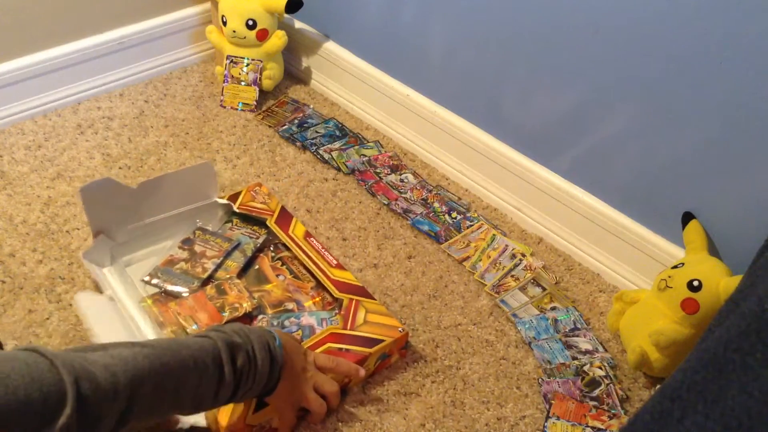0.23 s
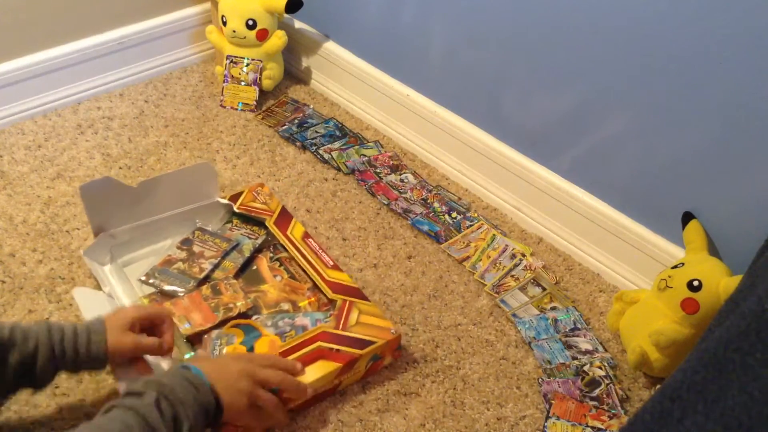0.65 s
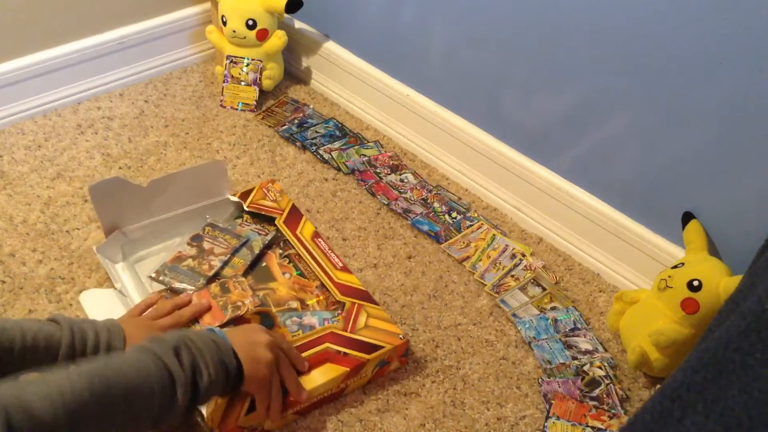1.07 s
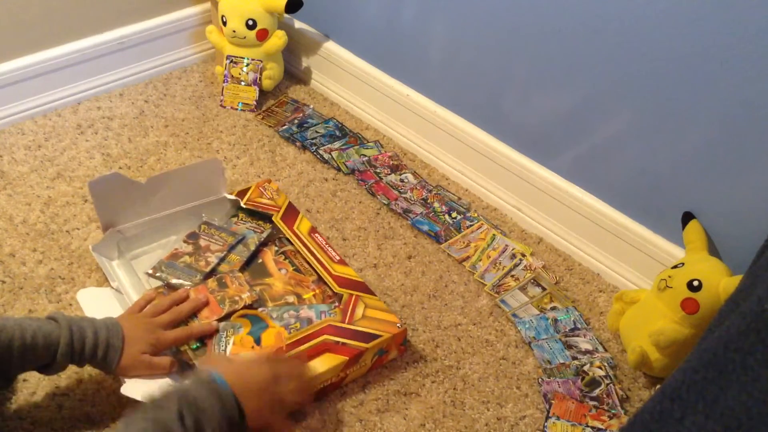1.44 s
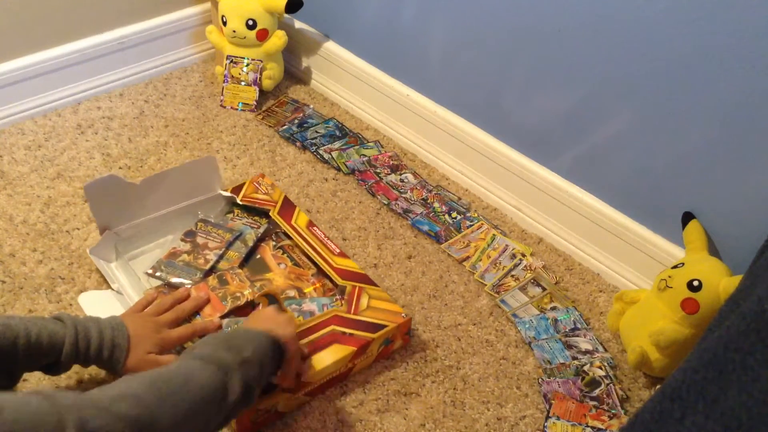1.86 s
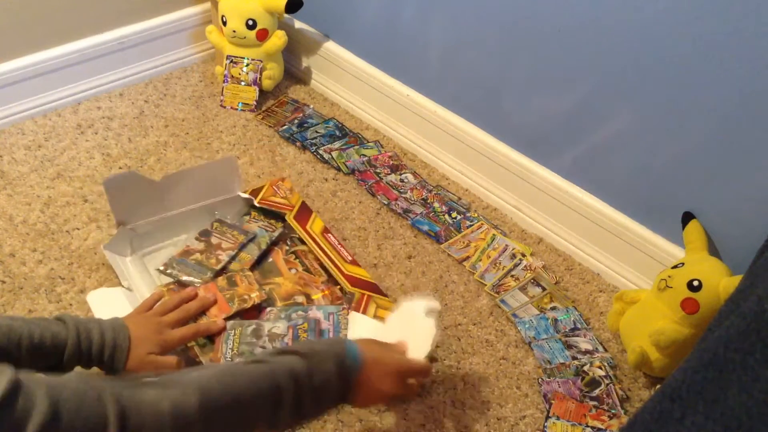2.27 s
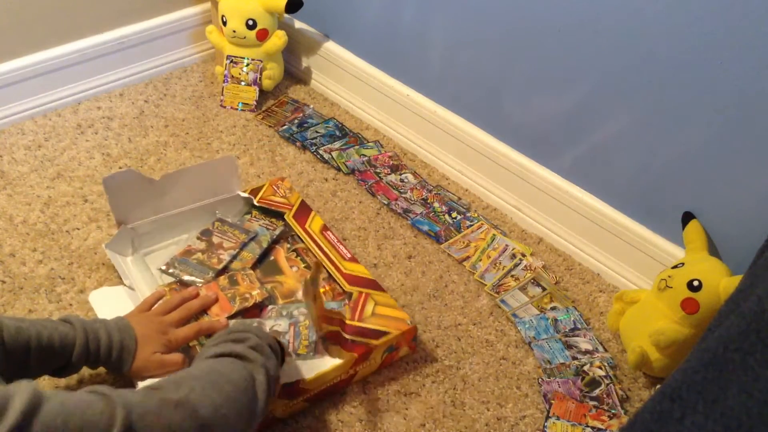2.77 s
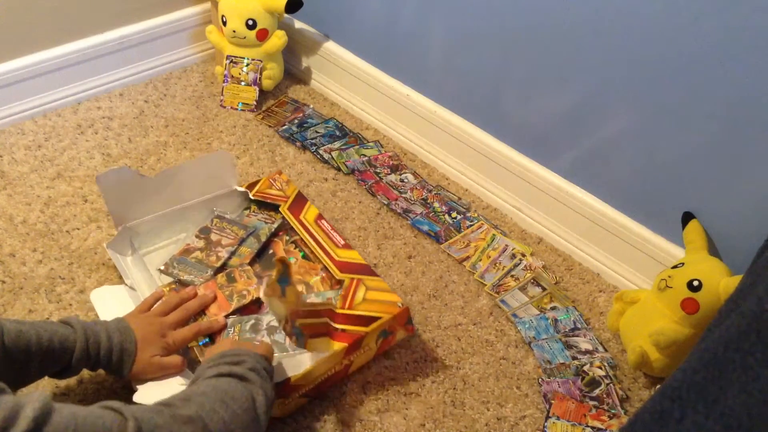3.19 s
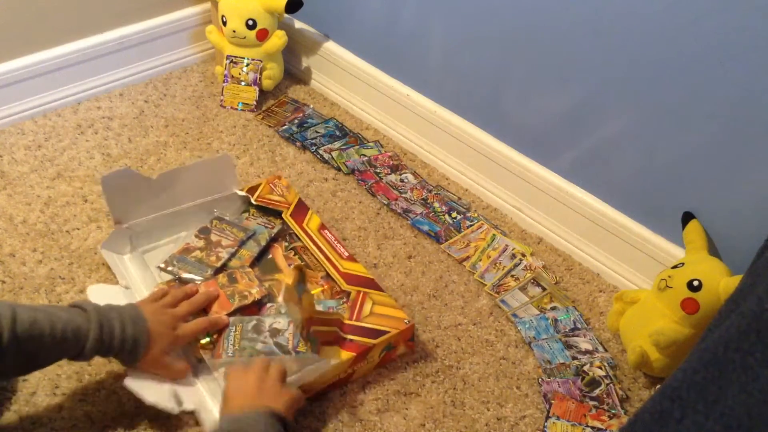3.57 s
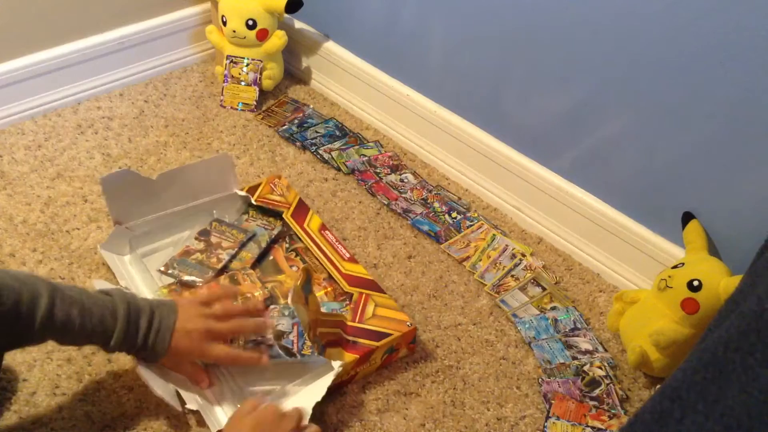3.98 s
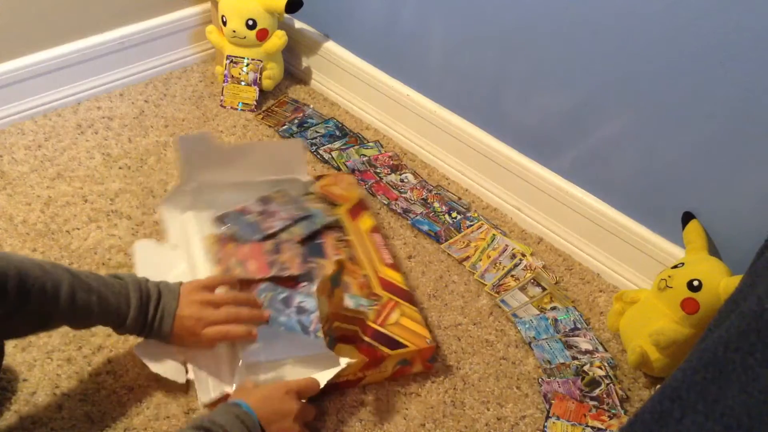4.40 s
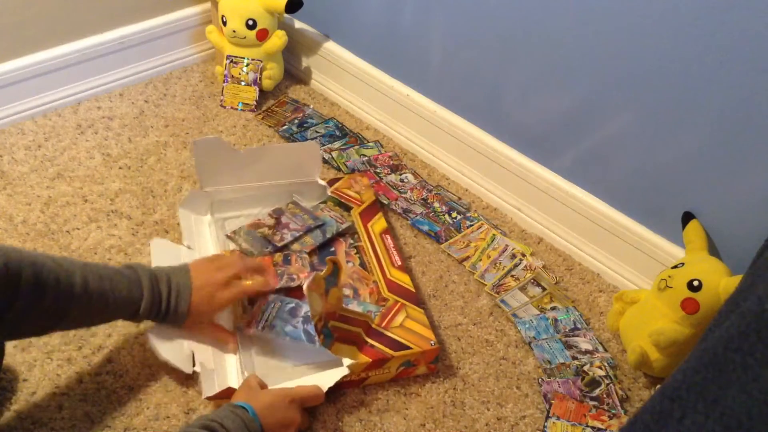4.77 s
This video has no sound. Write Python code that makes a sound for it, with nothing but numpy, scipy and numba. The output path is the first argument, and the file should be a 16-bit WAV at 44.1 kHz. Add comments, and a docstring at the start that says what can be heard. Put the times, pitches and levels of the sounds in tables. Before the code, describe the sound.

Irregular crackly plastic rustles, dry card ticks and small hollow thumps, with a very loud double crack midway, in a quiet carpeted room.

```python
"""Opening a cardboard box on carpet

Hands pry a cardboard box and its thin plastic tray open on a carpet, a metre from a small microphone.
Rubbing and snaps drive resonances of four bodies: the hollow box, its stiff flaps, the tray and its film.
Thumps are short decaying sines; the rubbing and snapping are made of stick-slip clicks.
A small carpeted room answers briefly through eight linked delay lines, over a faint shaped-noise hiss."""
import sys
import numpy as np
from scipy import signal
from scipy.fft import rfft, irfft
from scipy.io import wavfile
from scipy.ndimage import uniform_filter1d
from numba import njit

SR = 44100
rng = np.random.default_rng(int(sys.argv[2]) if len(sys.argv) > 2 else 0)


def to_wav(sig):
    """Store sig (one row per channel, or 1-D mono) as 16-bit WAV at the path in sys.argv[1].

    Samples outside -1..1 are clipped; the rate is SR.
    """
    pcm = np.clip(np.atleast_2d(sig), -1, 1) * 32767
    pcm = np.round(pcm).astype(np.int16)
    wavfile.write(sys.argv[1], SR, pcm.T)  # frames by channels


N = 222264  # samples, about 5 s

# resonances of the hollow box walls: (frequency [Hz], width [Hz], relative level [dB])
BOX_MODES = [(170.4, 47, -5), (248.7, 38, -1), (330.2, 50.3, 2.5), (460, 63, -2), (570, 117, -2.5),
             (721, 143, -3), (914, 142, -5.5)]
# resonances of the stiff flaps: (frequency [Hz], width [Hz], relative level [dB])
FLAP_MODES = [(1046, 356, -4.5), (1220, 480, 1), (1629, 242, 2.5), (1832, 140, 1), (2060, 385, -2.5),
              (2413, 330, -0.5), (3220, 920, -8.5)]
# resonances of the plastic tray: (frequency [Hz], width [Hz], relative level [dB])
TRAY_MODES = [(3660, 1300, -1), (4783, 483, 9), (4810, 930, 7), (6682, 294, -1.5), (6752, 87, 8),
              (8350, 2660, -4)]
# resonances of the crinkly film: (frequency [Hz], width [Hz], relative level [dB])
FILM_MODES = [(8930, 400, 1.5), (8700, 520, 9.5), (9670, 6400, 5.5), (13420, 2440, 7.5), (16800, 1650, 5.5)]
# spectrum of room tone and microphone noise: (frequency [Hz], relative level per Hz [dB])
HISS_SPECTRUM = [(64, 5), (157, 1.5), (336, -3), (616, -25), (988, -27), (1630, -27), (2120, -15.5),
                 (13700, -20), (16000, -40)]
# snaps of tray and card: (time [s], tray level [dB], film level [dB], card level [dB],
# burst t60 [s], first tick over the burst [dB])
SNAP_EVENTS = [(0.0707, -31, -38, -28.5, 0.049, 19), (.1144, -50, -36, -70, 0.074, 12),
               (0.153, -43, -53, -40, 0.065, 5), (0.2677, -47, -24, -39, 0.02, 12.5),
               (0.2942, -61, -39, -27, 0.079, 22), (0.33, -51, -33.5, -42, 0.16, 0),
               (0.4796, -53.5, -47, -54, 0.043, 8), (.6268, -45, -46, -45.5, 0.038, 10),
               (0.6995, -40, -38, -41, 0.052, 16.5), (0.7116, -35, -53, -46, 0.029, 16),
               (0.8, -53.5, -62, -55, 0.15, 5), (0.824, -47, -49, -45, 0.035, 4),
               (0.896, -50.5, -62, -47, 0.055, 12), (1.059, -51, -68, -59, 0.036, 5),
               (1.1325, -34, -44, -34.5, 0.072, 0), (1.1367, -20.5, -12, -26, 0.058, -9),
               (1.181, -63, -48, -33, 0.085, 0), (1.3495, -51, -43, -44.5, 0.026, 6),
               (1.552, -58, -64, -48, 0.035, 2), (1.562, -50.5, -52, -47, 0.19, 3),
               (1.7246, -54, -43.5, -38.5, 0.055, 8), (1.815, -61, -56, -74, .067, 3),
               (1.8526, -37.5, -47, -40.5, 0.036, 12), (1.8775, -36, -46, -47, 0.096, -5),
               (1.897, -39, -33, -41, 0.062, 15), (2.032, -56, -44, -29.5, 0.036, 17),
               (2.1121, -32, -39, -37, 0.067, 19.5), (2.125, -49, -51, -32.5, 0.038, 11),
               (2.164, -35.5, -49, -32.5, 0.036, 21), (2.2207, -44, -33, -41, 0.047, 10),
               (2.288, -39, -40.5, -42.5, 0.06, 10.5), (2.3147, -49, -40.5, -43.5, 0.076, 15),
               (2.394, -72, -67, -55, 0.07, 0), (2.467, -75, -75, -45.5, 0.023, 11),
               (2.5304, -40.5, -39, -35.5, 0.097, 20), (2.5588, -57, -66, -54, 0.12, 8),
               (2.6, -68, -52, -49, 0.031, 7), (2.658, -73, -73, -48, 0.037, 1),
               (2.7077, -59, -51, -42, 0.075, 0), (2.7236, -42, -46, -42, 0.05, 1),
               (2.8219, -47.5, -51, -46, .047, 14.5), (2.843, -72, -70, -40, 0.011, -3),
               (2.897, -45.5, -51, -41.5, 0.065, 2), (3.003, -52.5, -58, -54, 0.08, 9),
               (3.2897, -76, -75, -49, .03, 10), (3.343, -21, -23, -18.5, 0.074, 12),
               (3.3732, -17, -14, -17, 0.056, 19.5), (3.478, -44, -37, -37, 0.11, 8),
               (3.677, -49, -66, -48.5, 0.067, 0), (3.705, -65, -69, -49, 0.12, 11),
               (3.822, -61.5, -64, -60, 0.11, 26), (3.864, -39.5, -47, -34.5, 0.037, 13.5),
               (3.94, -58, -44, -51, 0.097, 13), (4.0584, -58, -60, -52.5, 0.18, 0),
               (4.187, -47, -47, -58, 0.1, 0), (4.234, -49, -60, -40.5, 0.031, 17),
               (4.2693, -53, -59, -49, 0.086, 25), (4.295, -52, -37.5, -48, 0.045, 11),
               (4.3755, -60, -58, -47, 0.074, 15), (4.4035, -53, -47, -57, .056, 20),
               (4.4435, -56, -45, -66, 0.03, 23.5), (4.4618, -67, -56, -74, 0.035, 22),
               (4.483, -36.5, -55, -55, 0.064, 4), (4.52, -45, -41, -54, 0.038, 21),
               (4.545, -58, -51, -53, 0.024, 3), (4.704, -42, -46, -52.5, 0.075, 3),
               (4.79, -48, -46.5, -64, 0.11, 8), (4.8133, -66, -48, -67, .03, 19),
               (4.8565, -62, -47, -41, 0.063, 5), (4.8864, -45.5, -47, -41, 0.063, 14),
               (4.905, -52, -48, -49, 0.056, 12), (4.958, -62, -64, -49, 0.047, 10),
               (4.971, -43, -53, -55, 0.099, 5)]
# knocks on walls (low) and flap edges (high): (time [s], level [dB], pitch [Hz], t60 [s])
KNOCK_EVENTS = [(.0705, -25.5, 2790, 0.047), (.072, -27.5, 1633, 0.042), (.153, -34, 622, .05),
                (0.2959, -12.5, 1377, 0.013), (.299, -27, 315, 0.089), (.709, -35, 655, 0.042),
                (0.768, -44, 1630, .04), (.822, -43, 335, .05), (.897, -38.5, 337, 0.068),
                (0.975, -42, 334, 0.048), (1.138, -27.5, 387, 0.024), (1.146, -23, 440, 0.042),
                (1.182, -32, 330, .04), (1.189, -12, 333, .035), (1.45, -47, 617, 0.041),
                (1.9675, -26, 1740, 0.084), (2.036, -25, 707, .075), (2.113, -32, 796, .04),
                (2.1248, -35, 3110, 0.035), (2.1655, -32.5, 3200, 0.04), (2.167, -34, 780, .04),
                (2.228, -33, 276, 0.074), (2.318, -36.5, 290, 0.052), (2.4682, -46, 1690, 0.031),
                (2.528, -31.5, 1570, 0.056), (2.53, -37, 706, .05), (2.535, -32.5, 354, 0.074),
                (2.602, -42, 1610, .04), (2.6585, -47, 1610, .04), (2.712, -30, 298, 0.037),
                (2.8424, -46, 1580, .04), (2.901, -31, 336, .064), (3.2914, -45, 1440, .028),
                (3.343, -14.5, 1645, 0.047), (3.344, -15.5, 940, 0.038), (3.346, -16.5, 396, 0.056),
                (3.376, -7, 1580, 0.019), (3.375, -16, 336, 0.045), (3.377, -22, 916, 0.044),
                (3.379, -15.5, 654, .05), (3.482, -31.5, 434, 0.082), (3.4844, -37.5, 2150, 0.089),
                (3.866, -34.5, 3230, 0.04), (3.866, -37, 5270, 0.033), (4.05, -45.5, 545, 0.044),
                (4.1, -40.5, 339, 0.21), (4.123, -36.5, 1614, .036), (4.192, -36.5, 800, 0.046),
                (4.2169, -38, 1665, .05), (4.234, -34, 329, .055), (4.2702, -40, 1694, .034),
                (4.379, -32, 330, .047), (4.518, -29.5, 1670, 0.032), (4.542, -28.5, 338, 0.057),
                (4.708, -44.5, 334, 0.18), (4.8574, -50, 2420, .022), (4.858, -41, 383, .05),
                (4.862, -33, 900, 0.029), (4.887, -25.5, 502, 0.018)]
# sliding and tearing: (time at full strength [s], hold [s], tray level [dB], film level [dB], card level [dB])
STROKE_EVENTS = [(0, 0.062, -52, -42.5, -48), (0.083, 0.065, -48.5, -44, -49),
                 (.21, 0.057, -44.5, -35.5, -46.5), (0.302, 0.033, -68, -44.5, -49),
                 (0.607, 0.01, -56, -59, -52), (1.106, 0.096, -61, -56, -65), (1.17, 0.019, -46, -45, -45),
                 (1.59, 0.16, -66.5, -62.5, -57.5), (1.884, 0.018, -41.5, -36, -50.5),
                 (1.927, 0.027, -41, -34.5, -39), (1.977, 0.043, -39.5, -30, -36.5),
                 (2.05, 0.038, -47, -40, -45.5), (2.19, .02, -57, -65, -57), (2.404, 0.024, -68, -64, -71),
                 (2.689, 0.014, -73, -63, -59), (3.07, 0.15, -72, -69, -67.5),
                 (3.396, 0.032, -39.5, -41, -42), (3.641, .12, -71, -57, -91),
                 (3.887, 0.06, -65.5, -77, -62), (4.119, 0.017, -52, -51, -50.5),
                 (4.22, 0.01, -54.5, -52, -47), (4.281, 0.012, -60, -52, -78), (4.39, 0.027, -71, -58, -77),
                 (4.508, 0.017, -42.5, -43, -46), (4.563, 0.025, -61, -67, -58),
                 (4.975, 0.072, -52, -49.5, -52.5)]
# hands resting and shifting on the card, before the shares below: (time [s], level [dB])
TOUCH_LEVEL = [(0, -94), (.45, -58), (.6, -58), (.9, -59.5), (1.1, -61.5), (1.3, -65.5), (1.5, -65),
               (1.7, -66.5), (2.2, -56), (2.4, -61.5), (2.55, -71.5), (2.75, -59.5), (3.0, -63.5),
               (3.3, -64.5), (3.55, -56.5), (3.9, -62), (4.35, -62.5), (4.6, -61), (4.68, -65), (4.9, -59),
               (5.04, -71)]
# how the touch divides: one level [dB] each for tray, film, flap, box
TOUCH_SHARES_DB = [-6.5, -3.5, -4, 0.5]

HISS_DB = -61  # rms, ahead of the microphone's bass cut
RUMBLE_DB = -92  # rms
# decay of the echo before damping; damping runs from 0 (bright) to 1
ROOM_T60_S, ROOM_DAMP, ROOM_DB = 0.13, 0.46, -18.5
TOP_HZ, BASS_CUT_HZ = 15400, 150
CLIP = .78  # full scale is 1
SOFT_RISE_S, HARD_RISE_S, SOFT_DB, HARD_DB = 0.003, 0.00095, -51, -14  # harder snaps rise faster
BOX_SNAP_DB, BOX_RUB_DB = 2.5, -3.9  # walls against flaps
BOX_EXTRA_RISE_S = 0.00052
ATTACK_DB_PER_S, RELEASE_DB_PER_S = 435, 400  # strokes
WALL_HZ, EDGE_HZ, WALL_RISE_S, EDGE_RISE_S = 500, 1300, 0.0014, .0004  # knocks
CRACK_UNDER_TICK_DB, CRACK_T60_S, TICK_DELAY_S = 11, .0022, .0008


def undb(db):
    """Gain of a level in dB."""
    return 10 ** (np.asarray(db) / 20)


def unit(x):
    """Scaled to rms 1."""
    return x / np.sqrt(np.mean(x ** 2))


def add(track, s, x):
    """Mixes x into the track from time s."""
    i = int(s * SR)
    track[i:i + len(x)] += x[:N - i]


def walk(rate):
    """Random levels, rate per second, joined by straight slopes; spread a little under 1."""
    k = int(SR / rate)
    held = np.repeat(rng.standard_normal(N // k + 1), k)
    return uniform_filter1d(held, k)[:N]


def ring(x, modes, patchy_db, rate):
    """A body as a sum of resonances; the touched spot wanders, so each is struck unevenly."""
    tick = np.zeros(8192)
    tick[0] = 1
    out, response = 0, 0
    for k, (hz, width, db) in enumerate(modes):
        b, a = signal.iirpeak(hz, hz / width, SR)
        gain = (-1) ** k * undb(db)  # neighbours alternate in sign
        uneven = x * undb(patchy_db * walk(rate))
        out = out + gain * signal.lfilter(b, a, uneven)
        response = response + gain * signal.lfilter(b, a, tick)
    return out / np.sqrt(np.sum(response ** 2))  # a single tick rings with unit energy


def crackle(rate, spread_db, cap_db=12):
    """Stick-slip clicks at random moments, rate per second, some bigger than the rest."""
    moment, side, size = rng.random((3, N))
    size_db = np.minimum(-spread_db * np.log(1 - size), cap_db)
    return unit((moment < rate / SR) * np.sign(side - .5) * undb(size_db))


def burst(db, t60, rise_s, tail_db, tail_t60):
    """Envelope of one release: a rise, a fast fall, then a weaker after-rattle."""
    t = np.arange(SR // 2) / SR
    fall = undb(-60 * t / t60)
    rattle = undb(tail_db - 60 * t / tail_t60)
    return undb(db) * (1 - np.exp(-t / rise_s)) * (fall + rattle)


def rubbing():
    """Drive of the four bodies as fingers and card slide and tear; the pressure never holds still."""
    t = np.arange(N) / SR
    touch_db = np.interp(t, *np.transpose(TOUCH_LEVEL))
    drive = undb(touch_db) * undb(TOUCH_SHARES_DB)[:, None]
    for s, hold_s, tray_db, film_db, card_db in STROKE_EVENTS:
        before = np.maximum(s - t, 0)
        after = np.maximum(t - s - hold_s, 0)
        stroke = undb(-ATTACK_DB_PER_S * before - RELEASE_DB_PER_S * after)
        body_gains = undb([tray_db, film_db, card_db, card_db + BOX_RUB_DB])
        drive = drive + body_gains[:, None] * stroke
    grip_db = 2.2 * walk(45)  # shared by all four
    own_db = [1.5 * walk(90), 1.6 * walk(80), 1.8 * walk(90), 2.2 * walk(60)]
    return drive * undb(grip_db + own_db)


def bodies(drive, blows):
    """Slips as strong as the drive, and single blows, ring tray, film, flaps and box."""
    slips = [crackle(6000, spread_db=5.5), crackle(9000, spread_db=4.5),
             crackle(3000, spread_db=6.0), crackle(4000, spread_db=3.23)]
    tray, film, flap, box = drive * slips + blows
    return (ring(tray, TRAY_MODES, patchy_db=2.0, rate=70)
            + ring(film, FILM_MODES, patchy_db=2.0, rate=40)
            + ring(flap, FLAP_MODES, patchy_db=1.12, rate=50)
            + ring(box, BOX_MODES, patchy_db=2.0, rate=25))


def hiss():
    """Steady room tone and microphone noise: white noise shaped across frequency."""
    hz, db = np.transpose(HISS_SPECTRUM)
    bins_hz = np.fft.rfftfreq(N, 1 / SR)
    colour = undb(np.interp(np.log(bins_hz + 1), np.log(hz), db))
    noise = irfft(rfft(rng.standard_normal(N)) * colour, N)
    return undb(HISS_DB) * unit(noise)


@njit
def walls(x, lags, gain, damp):
    """Room echo: eight delay lines that feed each other, duller on every round."""
    line, soft, out = np.zeros((8, 4096)), np.zeros(8), np.zeros(len(x))
    for i in range(len(x)):
        total = 0.
        for k in range(8):
            returned = gain[k] * line[k, (i - lags[k]) & 4095]
            soft[k] += (1 - damp) * (returned - soft[k])  # the treble is absorbed
            total += soft[k]
        out[i] = total
        for k in range(8):
            line[k, i & 4095] = x[i] + soft[k] - total / 4  # lossless mixing
    return out


def thumps():
    """A wall or flap is knocked and swings as a dying sine; flap edges start quicker than walls."""
    out, t = np.zeros(N), np.arange(SR // 2) / SR
    for s, db, hz, t60 in KNOCK_EVENTS:
        rise_s = np.interp(hz, [WALL_HZ, EDGE_HZ], [WALL_RISE_S, EDGE_RISE_S])
        swing = np.sin(2 * np.pi * hz * t)
        add(out, s, burst(db, t60, rise_s, tail_db=-29.0, tail_t60=0.21) * swing)
    return out


def snaps():
    """Drive of the four bodies: each snap is a first crack and a dying flurry of slips."""
    tray, film, flap, box = np.zeros((4, N))
    t = np.arange(SR // 2) / SR
    for s, tray_db, film_db, card_db, t60, tick_db in SNAP_EVENTS:
        hardest_db = max(tray_db, film_db, card_db)
        rise_s = np.interp(hardest_db, [SOFT_DB, HARD_DB], [SOFT_RISE_S, HARD_RISE_S])
        crack = undb(tick_db - CRACK_UNDER_TICK_DB - 60 * t / CRACK_T60_S)
        stiff = burst(0, t60, rise_s, tail_db=-64, tail_t60=0.067) + crack
        add(tray, s, undb(tray_db) * stiff)
        add(film, s, undb(film_db) * stiff)
        add(flap, s, undb(card_db) * stiff)
        # the heavier walls rise later and rattle on longer
        add(box, s, burst(card_db + BOX_SNAP_DB, 0.8 * t60, rise_s + BOX_EXTRA_RISE_S,
                          tail_db=-31.5, tail_t60=0.22))
    return np.array([tray, film, flap, box])


def ticks():
    """One hard impulse into each body just after the start of every snap."""
    out = np.zeros((4, N))
    for s, tray_db, film_db, card_db, _, tick_db in SNAP_EVENTS:
        # the plastic lets go a moment after it starts to give
        i = int((s + TICK_DELAY_S) * SR)
        body_db = np.array([tray_db, film_db + 2.5, card_db - 6.5, card_db - 4.5])
        out[:, i] = undb(body_db + tick_db)
    return out


def scene():
    """The handled box, its echo in the room and the hiss."""
    near = bodies(snaps() + rubbing(), ticks()) + thumps()
    lags = rng.integers(300, 1500, 8)  # samples
    round_gain = undb(-60 * lags / SR / ROOM_T60_S)
    room = walls(near + 1e-18, lags, round_gain, ROOM_DAMP)
    return (near + undb(ROOM_DB) * room + hiss())[None]


def record(dry):
    """The microphone drops the deep bass, clips high peaks, rumbles faintly and cuts the top."""
    bass_cut = signal.butter(4, BASS_CUT_HZ, "high", fs=SR, output="sos")
    thin = signal.sosfilt(bass_cut, dry)
    low_pass = signal.butter(1, 90, fs=SR, output="sos")
    rumble = undb(RUMBLE_DB) * unit(signal.sosfilt(low_pass, rng.standard_normal(N)))
    top_cut = signal.ellip(12, .2, 85, TOP_HZ, fs=SR, output="sos")
    return signal.sosfilt(top_cut, np.clip(thin, -CLIP, CLIP) + rumble)


dry = scene()
out = record(dry)
to_wav(out)
```